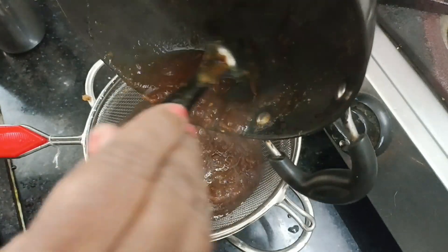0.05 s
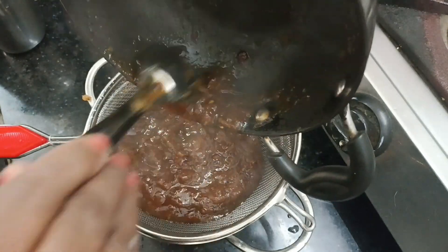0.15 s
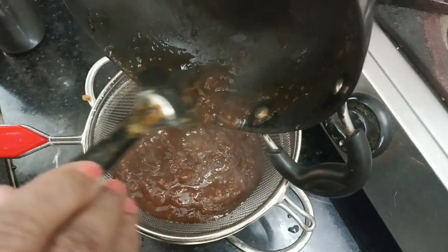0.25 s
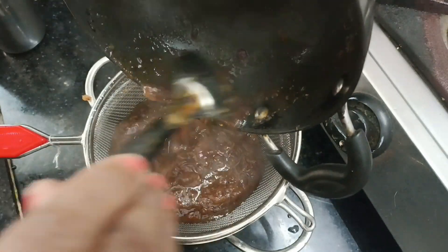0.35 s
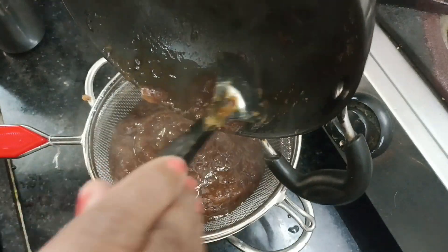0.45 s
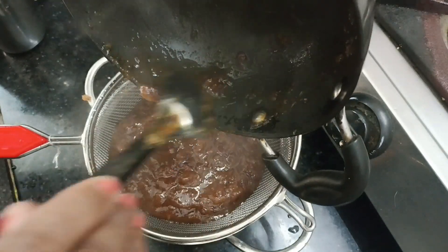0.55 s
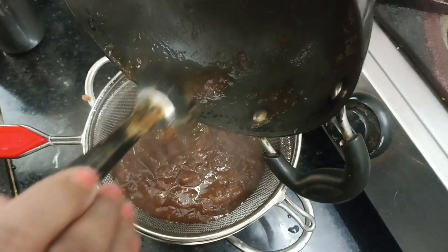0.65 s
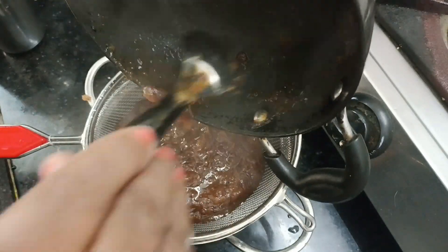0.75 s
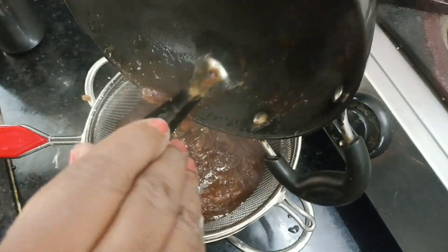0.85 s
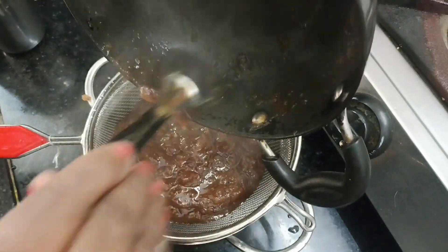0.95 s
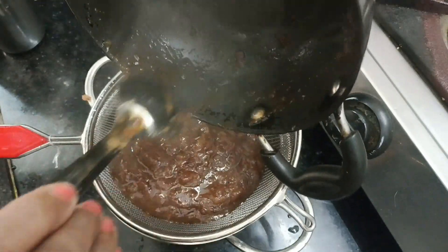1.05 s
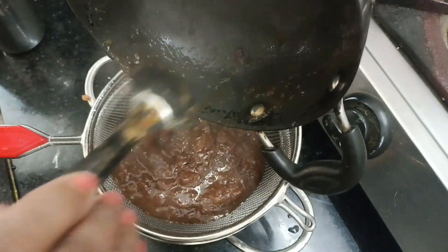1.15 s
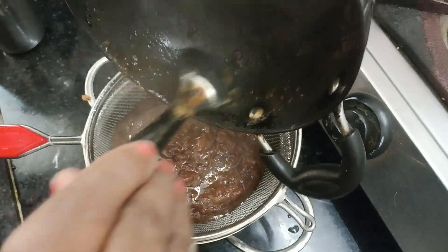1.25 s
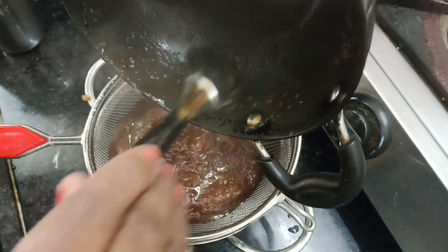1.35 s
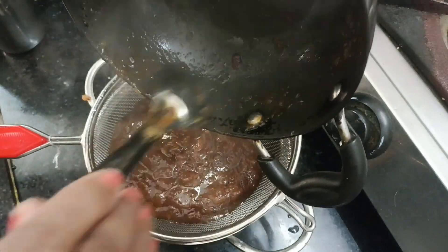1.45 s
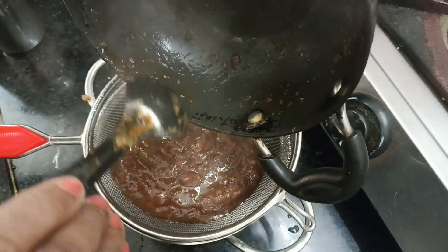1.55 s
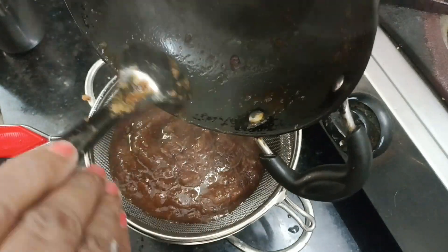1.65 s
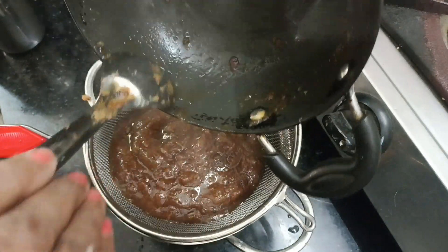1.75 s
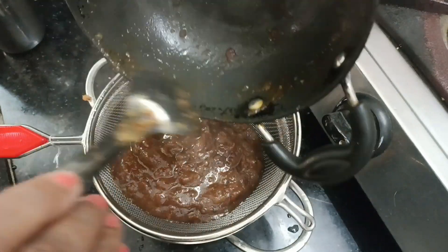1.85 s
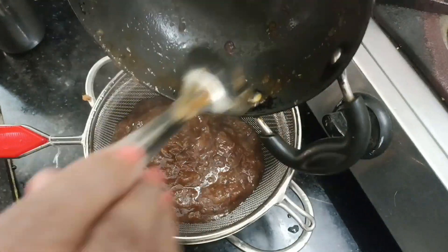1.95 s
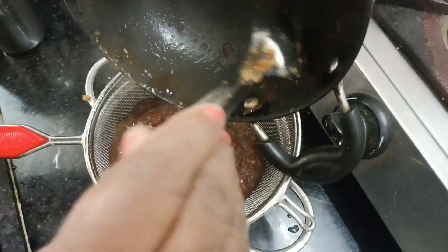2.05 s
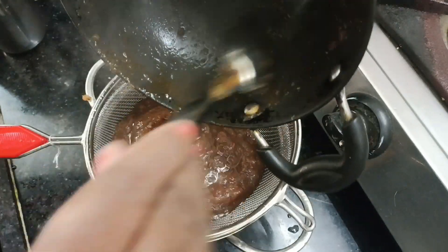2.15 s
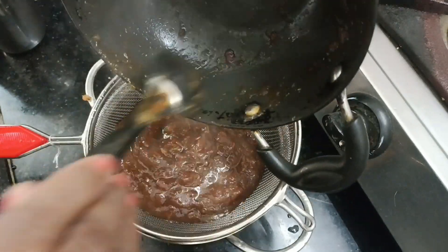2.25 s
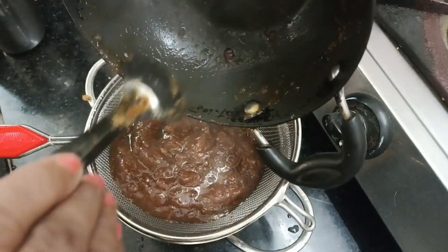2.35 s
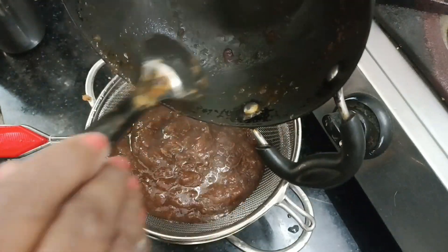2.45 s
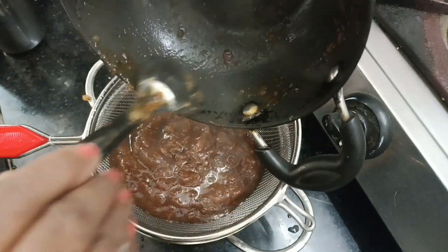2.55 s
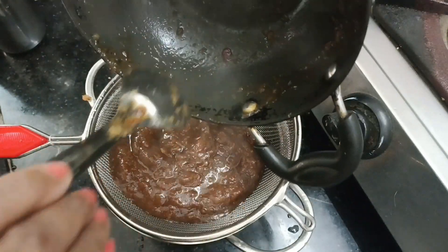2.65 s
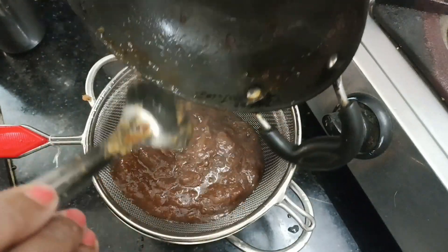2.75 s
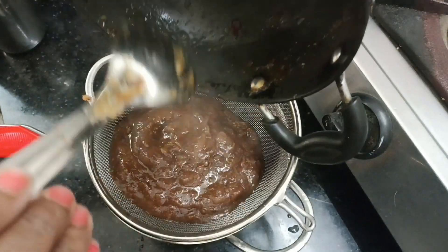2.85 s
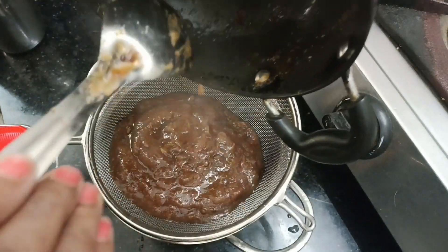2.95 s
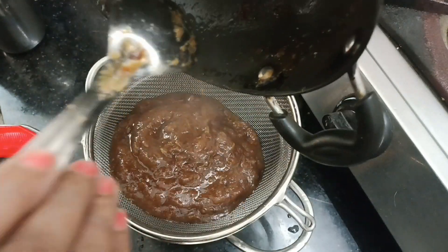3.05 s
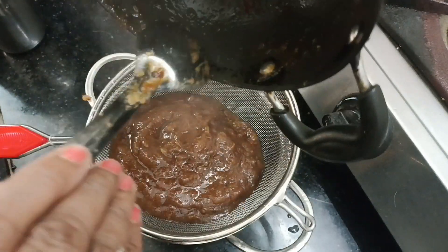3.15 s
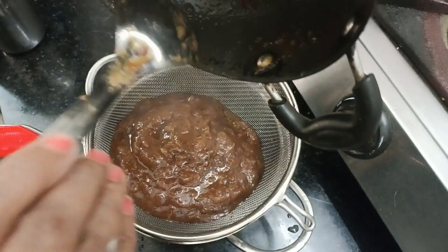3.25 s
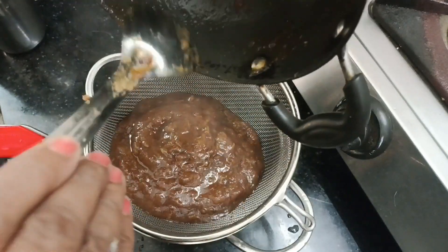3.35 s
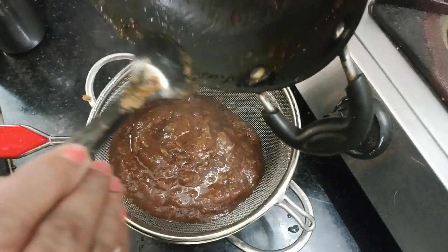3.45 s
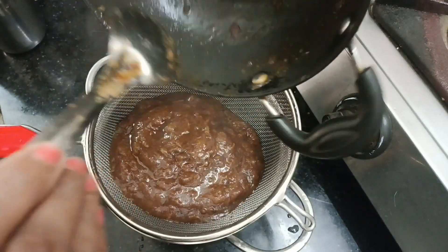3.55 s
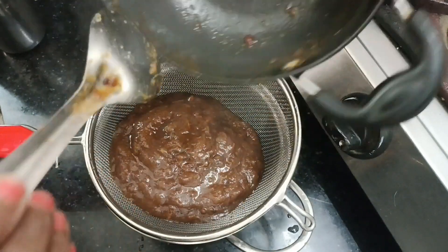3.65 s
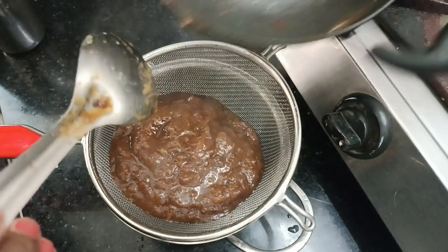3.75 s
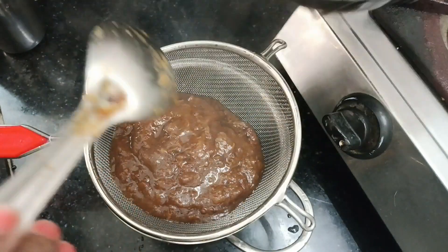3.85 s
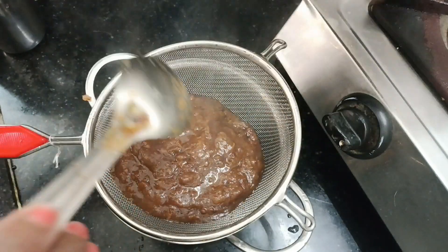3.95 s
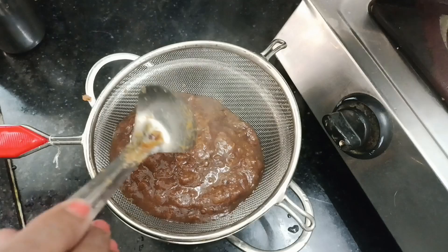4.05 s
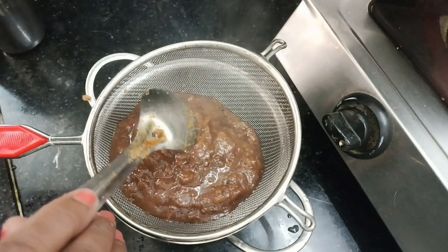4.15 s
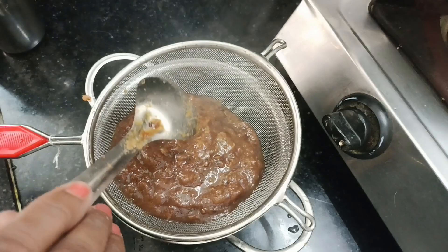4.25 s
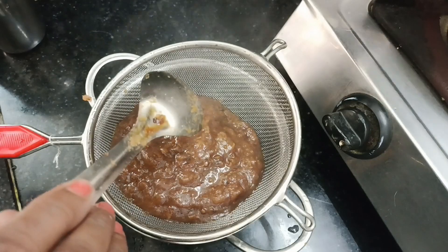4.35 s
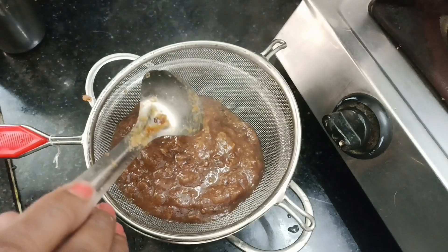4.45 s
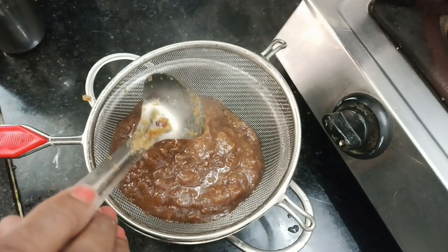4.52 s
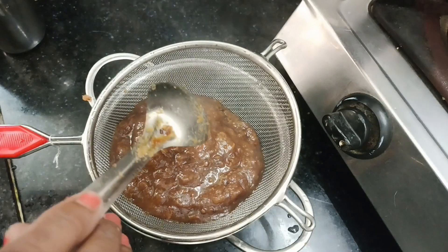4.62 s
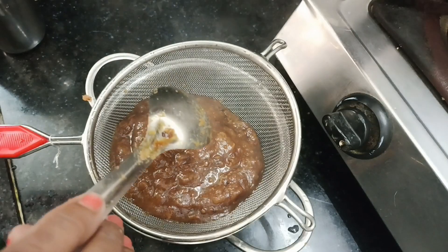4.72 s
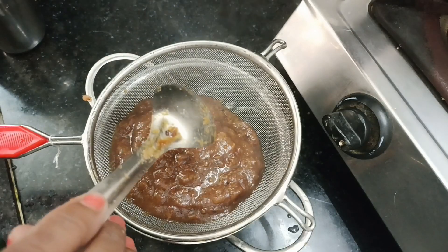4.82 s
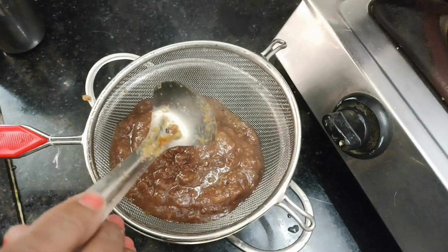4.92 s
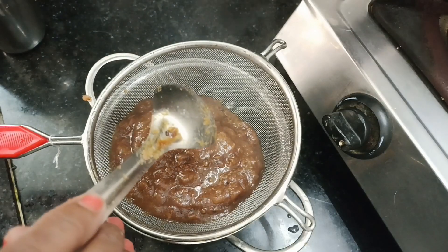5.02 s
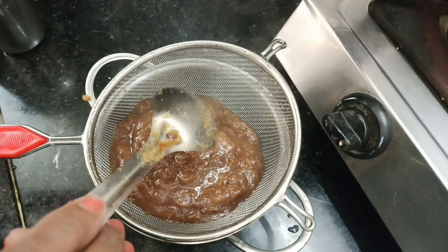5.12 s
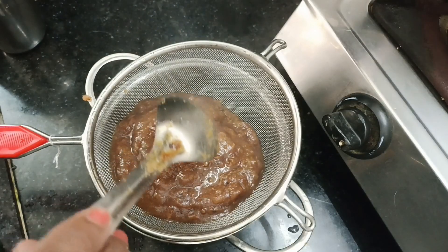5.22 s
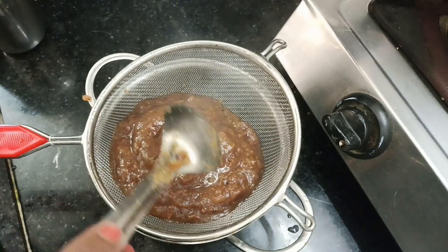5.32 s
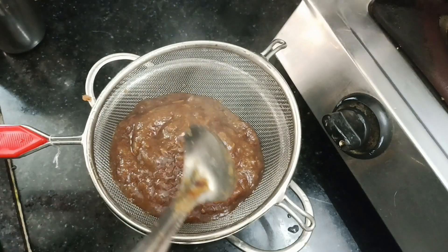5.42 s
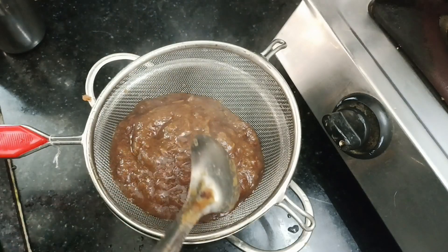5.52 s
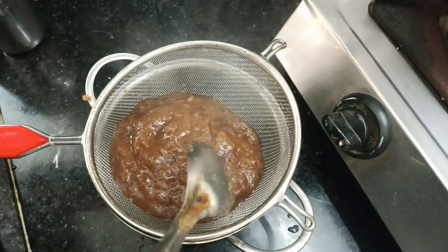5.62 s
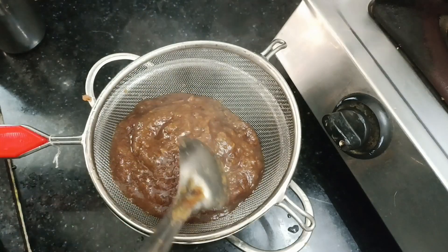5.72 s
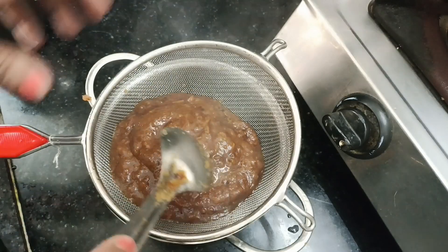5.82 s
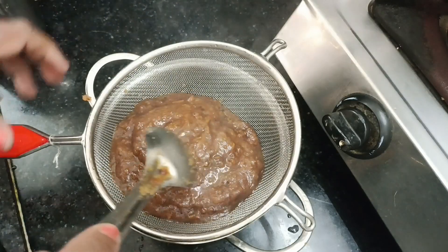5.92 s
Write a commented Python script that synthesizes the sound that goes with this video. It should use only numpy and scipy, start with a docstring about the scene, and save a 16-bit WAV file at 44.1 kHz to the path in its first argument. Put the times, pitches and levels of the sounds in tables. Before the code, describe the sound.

Close handheld microphone, quiet kitchen with short echoes. First, metallic taps, each mostly paired with a short rasp, as a spoon cleans a wok; then quick, bright raps on its rim, with short ringing tails. After a near pause with low handling rumble, the wok lands with a dull knock and rocks in smaller clacks. Thick pulp squelches softly near the end, with a barely audible mesh rasp.

```python
"""Steel clacks and gritty scrapes ring out close by, then duller knocks, faint squelches and soft low bumps.
A steel spoon scrapes pulp off a tilted wok and is rapped clean on its rim: noise bursts excite decaying sines.
The wok is set down and rocks on its support; the spoon starts to press the pulp into a mesh strainer: shaped grit.
A hand shifts on the phone: rumble and low tone bursts. A small kitchen adds echoes, a diffuse tail and a noise floor."""
import sys
import numpy as np
from scipy import signal
from scipy.io import wavfile
from scipy.ndimage import uniform_filter1d

SR = 44100
rng = np.random.default_rng(int(sys.argv[2]) if len(sys.argv) > 2 else 0)


def output_pcm(signal):
    """Save a mono or channel-first signal as 16-bit PCM at the path in sys.argv[1].

    Samples are clipped to [-1, 1] before scaling.
    """
    pcm = np.clip(np.atleast_2d(signal).T, -1, 1) * 32767
    wavfile.write(sys.argv[1], SR, np.round(pcm).astype(np.int16))


N = 263531
BLOW_S = 0.1  # reference duration for the energy of a short sound

# upper wok mode clusters: (centre [Hz], width [Hz], t60 [s], level [dB])
WOK_CLUSTERS = [(4190, 250, 0.52, -8), (5420, 630, 0.52, -13.5), (6710, 210, 0.37, -5.5),
                (8260, 450, 0.48, -12.5), (9390, 210, 0.32, -14), (9830, 330, 0.35, -14),
                (11400, 550, 0.36, -21)]


def taps(wet_db=-2, touch_db=-19, touch_lead_s=0.0013, rim_ring_db=3, tink_t60_s=0.13,
         grip_s=0.053, grip_db=-5):
    """The spoon touches, then lands: a clack and a tink, its own short ping and the longer ring of the wok."""
    # spoon meets wok: (time [s], level [dB], lows [dB], brightness [dB], spoon ring [dB],
    # wok ring before rim boost [dB re clack], place [0 wall - 1 rim], contact decay [s], tink [Hz], tink [dB])
    spoon_blows = [(0.0623, -52, 15.5, 0, -43, -8, 0.65, 0.014, 2267, -51.5),
                   (0.389, -43.5, -9.5, -6, -56.5, -13, .3, 0.012, 3900, -55),
                   (0.4648, -47.5, -2.5, 2, -49, -18, 0, 0.0022, 3570, -70),
                   (0.844, -44.5, 5, -5.5, -40, -12.5, 0.96, 0.0026, 1800, -51),
                   (1.266, -38.5, 6.5, -3, -35.5, -4, 0.13, 0.013, 3800, -44.5),
                   (1.6586, -33.5, -10, 8, -39.5, -10.5, 0, 0.0014, 3760, -38.5),
                   (2.045, -44.5, 9.5, 4.5, -35, -18, 0, 0.0012, 5070, -46.5),
                   (2.4859, -29.5, -15, 1, -49, -9, 0, 0.004, 4100, -41),
                   (3.052, -26.5, -4, 5.5, -53, -7, 0.78, 0.011, 3736, -34.5),
                   (3.229, -27.5, -1, 3.5, -61, -6.5, .7, 0.0024, 3620, -42),
                   (3.385, -28, -0.5, 4.5, -55.5, -10, 0.57, 0.0032, 3592, -38.5),
                   (3.614, -33, -5.5, -3, -41, -11, 0.74, 0.0035, 1880, -63)]
    # clack spectrum: (frequency [Hz], density [dB per Hz])
    clack_spectrum = [(200, -30.5), (400, -27.5), (550, -20), (850, 0), (1300, -1.5), (1900, 2.5),
                      (2800, 3), (4100, 1), (5500, -4), (7000, -6.5), (8800, -9.5), (10000, -11),
                      (12500, -18.5), (15000, -25)]
    # spoon modes, damped by the hand: (frequency [Hz], t60 [s], level [dB])
    spoon_modes = [(537, 0.13, -22), (855, 0.16, -18), (1945, 0.3, -19.5), (2309, 0.33, 5), (2336, 0.25, 0),
                   (4840, 0.13, -19.5), (4250, .18, -13.5), (7526, .16, -18)]
    out = np.zeros(N)
    for s, db, lows, bright, spoon_db, wok_db, place, decay, tink_hz, tink_db in spoon_blows:
        chatter = contact(decay, rise_s=0.00047, rattle_db=-36.5, rattle_decay_s=0.025)
        force = shell(colour(chatter, clack_spectrum), db=-5)
        clack = blow(kitchen(force, wet_db))[:SR // 2]
        metal = amp(wok_db + rim_ring_db * place) * wok_ring(place)
        add(metal, 0, clack)
        add(out, s, amp(db) * colour(metal, hardness(lows, bright)))
        add(out, s - touch_lead_s, amp(db + touch_db) * blow(np.diff(force)))

        tink_modes = [(tink_hz, tink_t60_s, 0), (tink_hz * 0.86, tink_t60_s / 2, -3)]
        add(out, s, amp(tink_db) * blow(ring(tink_modes)))

        ping = ring(spoon_modes)
        t = np.arange(len(ping)) / SR
        damping_db = np.interp(t, [grip_s / 2, grip_s], [0, grip_db])  # pressing on damps the spoon
        add(out, s, amp(spoon_db) * blow(ping * amp(damping_db)))
    return out


def scrapes(ring_db=-6, wet_db=-3):
    """The spoon's edge slips over the gritty wall and keeps the wok ringing."""
    # spoon drags over wok: (start [s], end [s], level [dB], swelling share [0-1, clipped], treble [dB])
    drag_strokes = [(-0.03, 0.02, -49.5, 0.26, -3), (0.083, 0.143, -41.5, 0.49, -12.5),
                    (0.413, 0.442, -40, 1, -24), (0.89, 1.003, -42.5, 0.13, -8),
                    (1.351, 1.45, -45, 0.43, -7.5), (1.68, 1.733, -56, 0.42, 15.5),
                    (2.139, 2.209, -42, 0.55, -6.5), (2.187, 2.248, -41.5, 0.43, -8.5),
                    (2.537, 2.627, -48.5, 0.88, 2.5)]
    # scrape spectrum: (frequency [Hz], density [dB per Hz])
    scrape_spectrum = [(300, -26), (600, -32.5), (950, -21), (1300, -8), (1900, 0), (2500, 0.5), (3200, -3),
                       (4200, -4), (5500, -9.5), (6800, -7), (8800, -21), (10000, -17.5), (15000, -35.5)]
    out = np.zeros(N)
    for start, end, db, swell, treble_db in drag_strokes:
        count = max(round((end - start) * SR), 400)
        peak = np.clip(swell, 0.05, 0.95)
        pressure = np.interp(np.linspace(0, 1, count), [0, peak, 1], [0.1, 1, 0.35])
        slips = pressure * lumpy(count, db=3, size=200) * grit(count, per_s=1300, spread_db=5)
        slips = np.pad(slips, (0, SR // 2))  # room for the tails
        surface = shell(colour(slips, scrape_spectrum), db=-4.5)
        rasp = blow(kitchen(slide(surface), wet_db))
        metal = blow(signal.fftconvolve(slips, wok_ring(0))[:len(slips)])
        sound = colour(rasp + amp(ring_db) * metal, [(2500, 0.0024), (8000, treble_db)])
        add(out, start, amp(db) * np.sqrt(count / SR / BLOW_S) * sound)
    return out


def set_down(wet_db=-1, support_db=-5, lead_s=0.0033, judder_db=4):
    """The heavy wok lands on its support, judders and rocks: slow, dull contacts excite both bodies."""
    # wok set down and rocking: (time [s], level [dB], lows [dB], brightness [dB],
    # wok ring [dB re clunk], contact decay [s], rattle [dB re contact])
    support_blows = [(4.487, -28, 1.5, -6, -27, 0.012, -22.5), (4.747, -59, 9, -21, -31.5, 0.009, -28),
                     (4.851, -45.5, -5.5, 3, -5.5, 0.0041, -46), (4.909, -46.5, 0, -11, -22, 0.0072, -33),
                     (5.074, -53.5, 0.5, -2.5, -43.5, 0.02, 5), (5.134, -37, -2, -0.5, -13.5, 0.012, -24),
                     (5.402, -69, 6, -10.5, -12, 0.0028, -30)]
    # clunk spectrum: (frequency [Hz], density [dB per Hz])
    clunk_spectrum = [(50, -22.5), (120, -23.5), (230, -13), (380, 0), (800, 0), (1400, -5.5), (2200, -3.5),
                      (3200, -8), (3850, -17.5), (4700, -18.5), (6500, -19), (8000, -30), (10000, -31.5),
                      (14000, -54)]
    # support modes: (frequency [Hz], t60 [s], level [dB])
    support_modes = [(270, .2, -8), (403, .75, -1), (463, .6, -10), (529, .3, -7), (680, .4, -5),
                     (791, .45, -3), (1003, .45, -9), (1199, .4, -6), (1432, .35, 0), (1560, .3, -5),
                     (1776, .45, -8), (1992, .3, -7), (2740, .3, -8), (3176, .35, -10), (3278, .5, -10),
                     (4230, .5, -10)]
    out = np.zeros(N)
    for s, db, lows, bright, wok_db, decay, rattle_db in support_blows:
        force = contact(decay, rise_s=0.0072, rattle_db=rattle_db, rattle_decay_s=0.081)
        force *= lumpy(len(force), judder_db, size=120)
        sound = blow(kitchen(colour(force, clunk_spectrum), wet_db))
        add(sound, 0, amp(support_db) * blow(ring(support_modes, rise_s=0.0025)))
        metal = colour(wok_ring(0), [(2500, 2.0), (4300, 3.5), (5600, -3), (7000, -23.0),
                                     (8300, -22.0), (10000, -15.5), (12000, -12.0)])
        add(sound, 0, amp(wok_db) * metal)
        add(out, s - lead_s, amp(db) * colour(sound, hardness(lows, bright)))
    return out


def pressing(attack_s=0.018, sag_db_per_s=32, release_db_per_s=398):
    """Thick pulp gives way under the spoon; as the push builds, the wire mesh rasps faintly."""
    # pushes into the mesh: (start [s], length [s], squelch [dB], rasp [dB], mesh pitch [factor])
    pulp_pushes = [(4.162, 0.11, -63, -66.5, .755), (5.54, 0.21, -51, -66, 0.93)]
    # mesh resonances: (frequency before pitch factor [Hz], width [Hz], level [dB])
    mesh_modes = [(1910, 120, -16), (2310, 28, -8.5), (2510, 120, -2.5), (2705, 31, -1.5)]
    # squelch spectrum: (frequency [Hz], density [dB per Hz])
    squelch_spectrum = [(120, -27), (320, 14.5), (450, 5.5), (600, -4), (900, -5.5), (1300, -30),
                        (4000, -38), (9000, -64)]
    hoop_hz, hoop_width_hz, hoop_db = 3193, 120, -10.5  # the strainer's hoop keeps its pitch
    rasp_peak, rasp_width = 0.67, 0.36  # the mesh tightens late: shares of the push
    out = np.zeros(N)
    for start, length, squelch_db, rasp_db, pitch in pulp_pushes:
        push = gesture(length, attack_s, release_db_per_s, sag_db_per_s)
        count = len(push)
        squelch = unit(colour(grit(count, per_s=900, spread_db=1), squelch_spectrum))
        add(out, start, amp(squelch_db) * push * squelch)

        wires = grit(count, per_s=1500, spread_db=1)
        modes = [(hz * pitch, width, db) for hz, width, db in mesh_modes]
        modes.append((hoop_hz, hoop_width_hz, hoop_db))
        rasp = np.zeros(count)
        for hz, width, db in modes:
            rasp += amp(db) * unit(resonance(resonance(wires, hz, width), hz, width))
        progress = np.arange(count) / SR / length
        swell = 1 / np.cosh((progress - rasp_peak) / rasp_width) ** 2
        add(out, start, amp(rasp_db) * swell * unit(rasp))
    return out


def handling(attack_s=0.01, release_db_per_s=647):
    """The hand shifts on the phone: lumpy rumble and a few soft thumps."""
    # grip shifts: (start [s], length [s], level [dB])
    grip_shifts = [(3.6, 0.081, -50.5), (3.72, 0.27, -69.5), (4.089, .33, -67.5), (4.143, .14, -52.5),
                   (4.485, .135, -50.5), (5.16, 0.229, -57), (5.475, 0.42, -53.5)]
    # rumble spectrum: (frequency [Hz], density [dB per Hz])
    rumble_spectrum = [(20, -42), (50, -11), (90, 2.5), (170, 5.5), (260, -5), (400, -17.5), (900, -49),
                       (3000, -77)]
    # soft low bumps: (time [s], pitch [Hz], level [dB], Gaussian half-width [s])
    soft_thumps = [(3.595, 159, -35, 0.006), (4.165, 152, -41, 0.0042), (5.56, 194, -44.5, 0.005)]
    out = np.zeros(N)
    for start, length, db in grip_shifts:
        rub = gesture(length, attack_s, release_db_per_s)
        rumble = unit(colour(grit(len(rub), per_s=900, spread_db=1), rumble_spectrum))
        add(out, start, amp(db) * rub * rumble)
    t = np.arange(-SR // 20, SR // 20) / SR
    for s, hz, db, width in soft_thumps:
        envelope = np.exp(-(t / width) ** 2)
        add(out, s + t[0], amp(db) * np.sqrt(2) * envelope * np.sin(2 * np.pi * hz * t))
    return out


def whines(waver=0.026):
    """Brief, slightly unsteady tones of rubbed steel; waver is the rms pitch drift as a fraction."""
    # rubbed steel: (start [s], end [s], mean pitch [Hz], level [dB])
    rubbed_tones = [(2.182, 2.202, 990, -52.5), (2.483, 2.712, 337, -59), (2.744, 2.915, 660, -73.5),
                    (2.98, 3.081, 897, -67), (3.858, 4.014, 792, -71), (5.044, 5.121, 1450, -56),
                    (5.388, 5.442, 757, -65)]
    out = np.zeros(N)
    for start, end, hz, db in rubbed_tones:
        count = max(round((end - start) * SR), 400)
        drift = unit(uniform_filter1d(rng.standard_normal(count), size=500))
        tone = np.sin(2 * np.pi * np.cumsum(hz * (1 + waver * drift)) / SR)
        envelope = lumpy(count, db=3.0, size=600) * signal.windows.tukey(count, 0.7)
        add(out, start, amp(db) * unit(tone * envelope))
    return out


def room_floor(level_db=-72):
    """Steady coloured noise of the quiet room."""
    # floor spectrum: (frequency [Hz], density [dB per Hz])
    floor_spectrum = [(18, -39.5), (30, -8), (184, 3), (473, -2.5), (780, -2), (1010, -7.5), (1250, -3.5),
                      (2540, -9.5), (4300, -15), (4650, -19.5), (7670, -17), (8980, -32.5), (16000, -32.5)]
    return amp(level_db) * unit(colour(rng.standard_normal(N), floor_spectrum))


def kitchen(x, wet_db, build_s=0.0065):
    """Direct sound, near echoes and a diffuse tail whose decay depends on frequency."""
    # room decay: (frequency [Hz], t60 [s])
    room_decay = [(100, 0.41), (400, 0.54), (800, 0.47), (2000, 0.47), (4000, 0.51), (7000, .3),
                  (10000, 0.13), (15000, 0.34)]
    # counter and tiled walls: (delay [s], gain [linear])
    near_echoes = [(.0031, 0.28), (.0074, -0.13), (.0122, 0.43), (0.0137, -0.23), (0.0184, 0.14)]
    hz, t, z = signal.stft(rng.standard_normal(SR // 2), SR, nperseg=256)
    decay = amp(-60 * t / read(room_decay, hz)[:, None])
    tail = signal.istft(z * decay, SR, nperseg=256)[1]
    tail *= (-np.expm1(-np.arange(len(tail)) / SR / build_s)) ** 2
    response = amp(wet_db) * tail / np.linalg.norm(tail)
    response[0] += 1
    for delay, gain in near_echoes:
        response[round(delay * SR)] += gain
    return signal.fftconvolve(x, response)[:len(x)]


def wok_ring(place, vary_db=2.0, count=10):
    """The wok's modes and mode clusters; the strengths of its single modes depend on where it is struck."""
    # wok modes: (frequency [Hz], t60 [s], mean level on wall [dB], mean level on rim [dB])
    wok_modes = [(1943, .6, -11, -10), (2300, .38, -6, -10), (2734, .45, -10, -13), (3609, .33, -14, -4),
                 (4221, .4, -7, -7), (4565, .35, -17, -13), (6768, .32, -9, 1), (7532, .32, -12, -19),
                 (830, .35, -19, -24), (1030, .35, -20, -12), (1730, .35, -14, -14), (2915, .4, -16, -13),
                 (3420, .45, -14, -12), (5410, .45, -14, -18)]
    place = np.clip(place, 0, 1)
    modes = []
    for hz, t60, wall, rim in wok_modes:
        modes.append((hz, t60, wall + place * (rim - wall) + vary_db * rng.standard_normal()))
    for hz, width, t60, db in WOK_CLUSTERS:
        share_db = db - 10 * np.log10(count)
        modes += [(hz + width * (u - 0.5), t60, share_db) for u in rng.random(count)]
    return blow(ring(modes))


def ring(modes, rise_s=0.0037):
    """Dying sines (Hz, t60 s, dB) set off by one blow; 1/sqrt(t60) evens out their energy."""
    t = np.arange(2 * SR // 3) / SR
    total = np.zeros(len(t))
    for hz, t60, db in modes:
        decay = np.exp(-np.log(1000) * t / t60)
        sine = np.sin(2 * np.pi * (hz * t + rng.random()))
        total += amp(db) * decay * sine / np.sqrt(t60)
    return -np.expm1(-t / rise_s) * total


def contact(decay_s, rise_s, rattle_db, rattle_decay_s):
    """Steel chatters on steel: a dense burst with a rattle of its own level and decay."""
    t = np.arange(SR) / SR
    burst = np.exp(-t / max(decay_s, 0.001))
    rattle = amp(rattle_db) * np.exp(-t / rattle_decay_s)
    force = -np.expm1(-t / rise_s) * (burst + rattle)
    return force * grit(len(t), per_s=14000, spread_db=0.5)


def hardness(lows_db, bright_db, top_offset_db=-4, top_follows=1.4):
    """Colour of one blow: bare steel is bright, pulp in between dulls it; the top follows the brightness."""
    top_db = top_offset_db + top_follows * bright_db
    return [(900, lows_db), (1700, 0.0066), (3900, 0.0057), (6500, bright_db), (12000, top_db)]


def slide(x, delay_s=0.000981, travel=0.3, depth=0.69):
    """A wave returns from the rim; as the contact point travels, the bands it makes glide."""
    at = np.arange(len(x))
    sway = np.sin(2 * np.pi * (1.5 * at / SR + rng.random()))  # 1.5 Hz
    delay = delay_s * SR * (1 + travel * sway)
    return x + depth * np.interp(at - delay, at, x, left=0)


def shell(x, db):
    """The wok's mode clusters colour whatever it radiates."""
    return x + amp(db) * sum(resonance(x, hz, width) for hz, width, _, _ in WOK_CLUSTERS)


def grit(count, per_s, spread_db):
    """A train of tiny slips of uneven size, rms 1."""
    size = amp(spread_db * np.minimum(rng.exponential(1, count), 4))
    size = size * rng.choice([-1, 1], count)
    return unit(size * (rng.random(count) < per_s / SR))


def lumpy(count, db, size):
    """A gain that wanders by db (rms) over about size samples."""
    return amp(db * unit(uniform_filter1d(rng.standard_normal(count), size=size)))


def gesture(length_s, attack_s, release_db_per_s, sag_db_per_s=0):
    """Envelope of one movement: attack, a hold that may sag, release."""
    t = np.arange(0, length_s + 0.2, 1 / SR)
    fall_db = sag_db_per_s * t + release_db_per_s * np.maximum(t - length_s, 0)
    return np.minimum(t / attack_s, 1) * amp(-fall_db)


def resonance(x, hz, width_hz):
    """One fixed resonance of peak gain 1."""
    return signal.lfilter(*signal.iirpeak(hz, hz / width_hz, SR), x)


def colour(x, points, size=4096):
    """Causal minimum-phase filter with the given (Hz, dB) spectrum."""
    log_gain = np.log(amp(read(points, abs(np.fft.fftfreq(size, 1 / SR)))))
    spectrum = np.exp(np.conj(signal.hilbert(log_gain)))
    impulse = np.fft.ifft(spectrum).real[:size // 2]
    return signal.oaconvolve(x, impulse)[:len(x)]


def read(points, hz):
    """Reads a (Hz, value) table on a log-frequency axis."""
    f, value = np.transpose(points)
    return np.interp(np.log(hz + 1), np.log(f + 1), value)


def amp(db):
    """Decibels to gain."""
    return 10 ** (np.asarray(db) / 20)


def unit(x):
    """Scales to rms 1."""
    return x / np.sqrt(np.mean(x ** 2) + 1e-20)


def blow(x):
    """Scales a short sound to the energy of rms 1 held for BLOW_S."""
    return x * np.sqrt(BLOW_S * SR / (np.sum(x ** 2) + 1e-20))


def add(mix, s, sound):
    """Adds a sound into the mix at time s, cut to fit."""
    at = round(s * SR)
    sound = sound[max(-at, 0):]
    part = mix[max(at, 0):][:len(sound)]
    part += sound[:len(part)]


def scene(width_db=-12, loud_db=-34):
    """All sources in the middle over a quiet room; mainly the treble of the loudest steel spreads sideways."""
    steel = taps() + scrapes() + set_down()
    mid = steel + pressing() + handling() + whines() + room_floor()
    highpass = signal.butter(14, 4100, "high", fs=SR, output="sos")
    treble = signal.sosfilt(highpass, steel)
    power = abs(uniform_filter1d(treble ** 2, size=1000))
    scatter = rng.standard_normal(SR // 60)
    side = signal.oaconvolve(treble, scatter / np.linalg.norm(scatter))[:N]
    side *= amp(width_db) * power / (power + amp(loud_db) ** 2)
    return np.array([mid + side, mid - side])


def record(dry, edge_hz=16300):
    """A noise suppressor pulls down weak bins and shortens the tails; then the band limit."""
    # suppressor threshold: (frequency [Hz], density [dB per Hz])
    gate_threshold = [(1000, -100), (4000, -101), (8000, -106), (15000, -112)]
    # suppressor's lowest gain: (frequency [Hz], gain [dB])
    gate_depth = [(800, -7), (2000, -11), (4000, -14), (8000, -9.5), (15000, -2)]
    hz, _, z = signal.stft(dry, SR, nperseg=512, noverlap=384, scaling="psd")
    power = uniform_filter1d(2 * abs(z.mean(0)) ** 2, size=5, axis=1).clip(0)
    threshold = amp(read(gate_threshold, hz))[:, None] ** 2
    lowest = amp(read(gate_depth, hz))[:, None]
    z = z * (lowest + (1 - lowest) * power / (power + threshold))
    gated = signal.istft(z, SR, nperseg=512, noverlap=384, scaling="psd")[1][:, :N]
    lowpass = signal.firwin(255, edge_hz, window=("kaiser", 9), fs=SR)
    return signal.oaconvolve(gated, lowpass[None], "same")


dry = scene()
out = record(dry)
output_pcm(out)
```